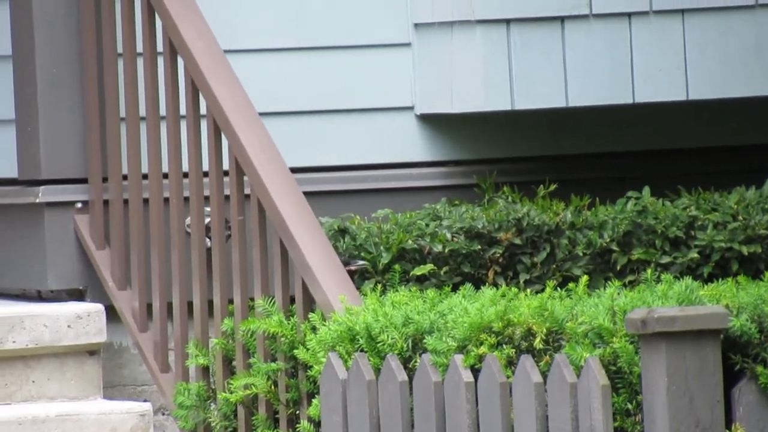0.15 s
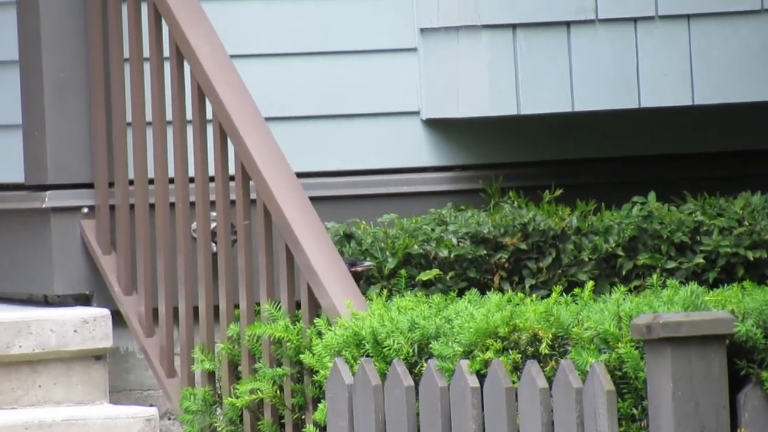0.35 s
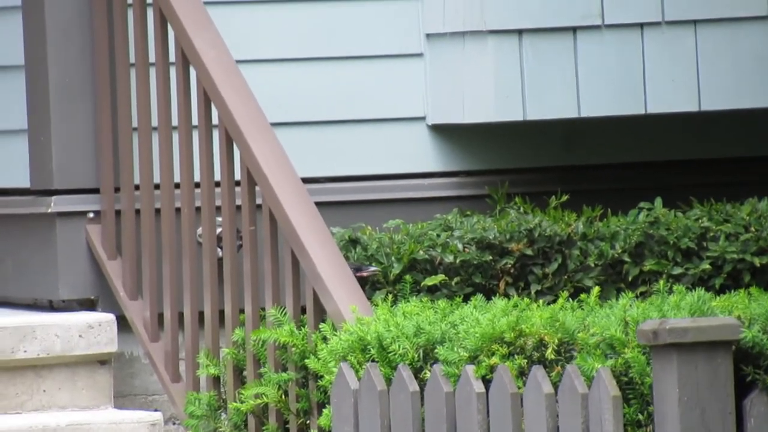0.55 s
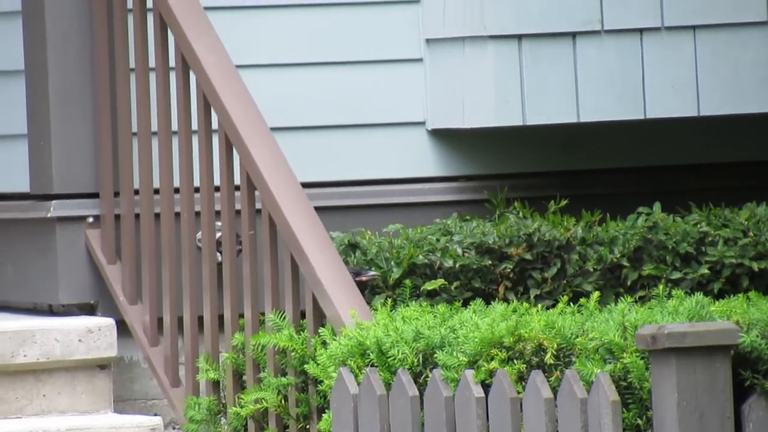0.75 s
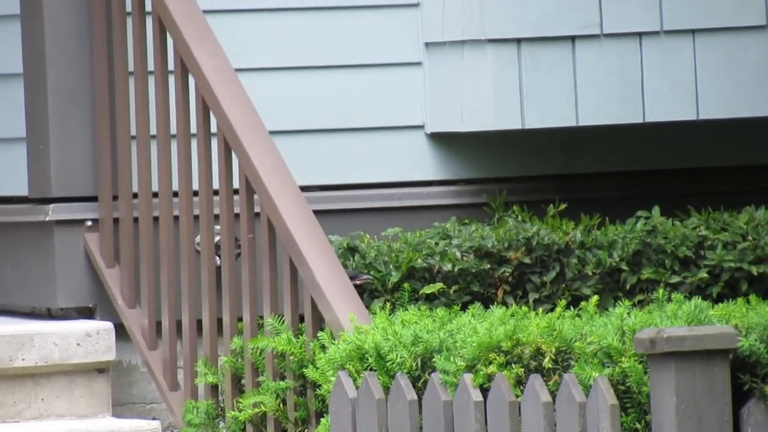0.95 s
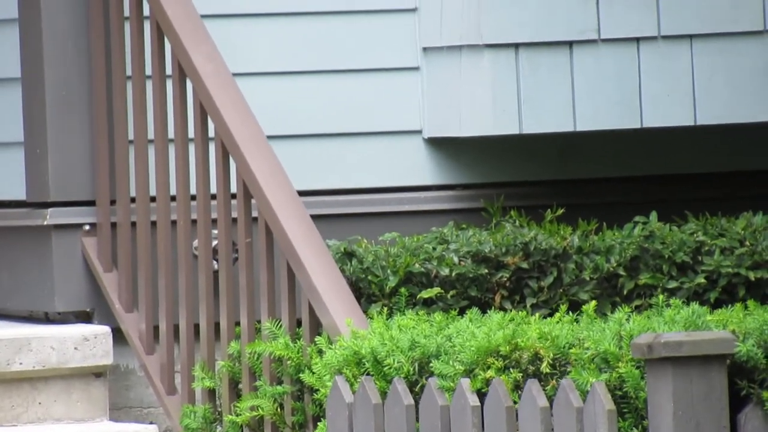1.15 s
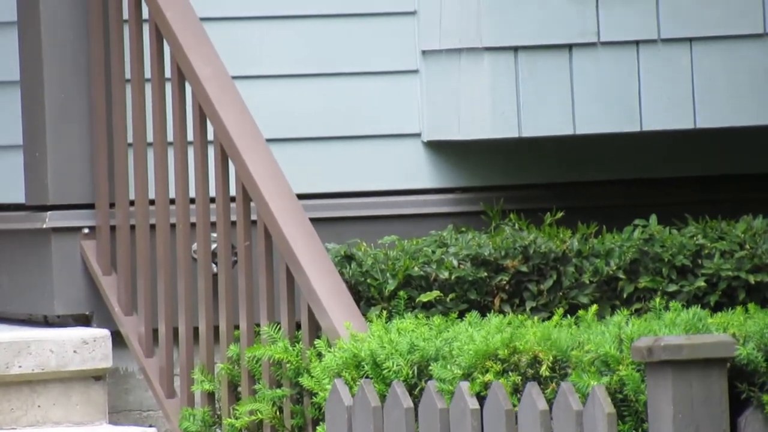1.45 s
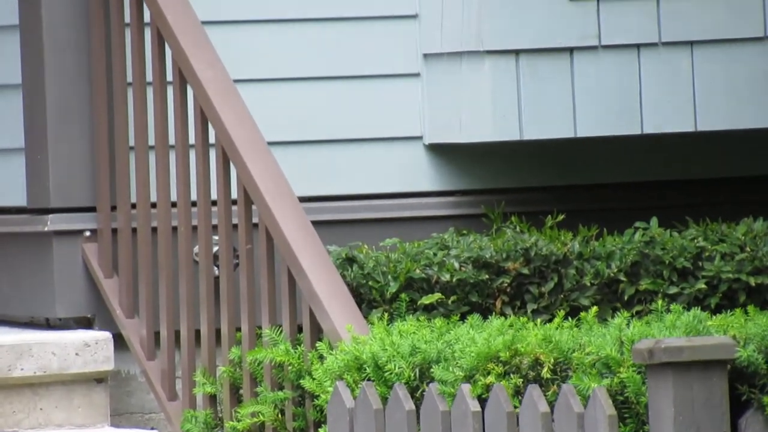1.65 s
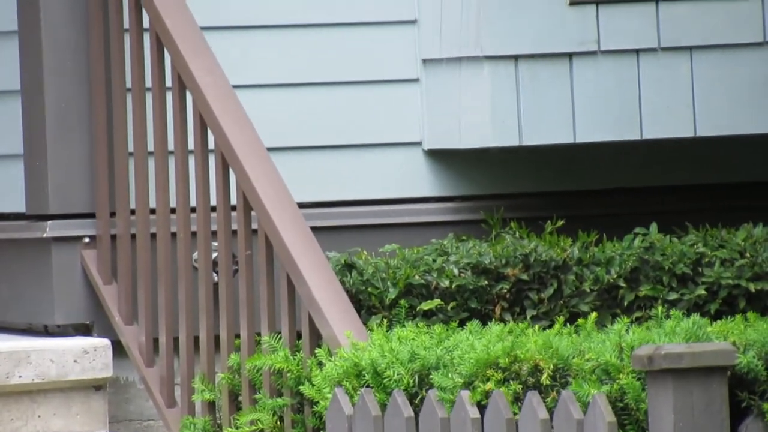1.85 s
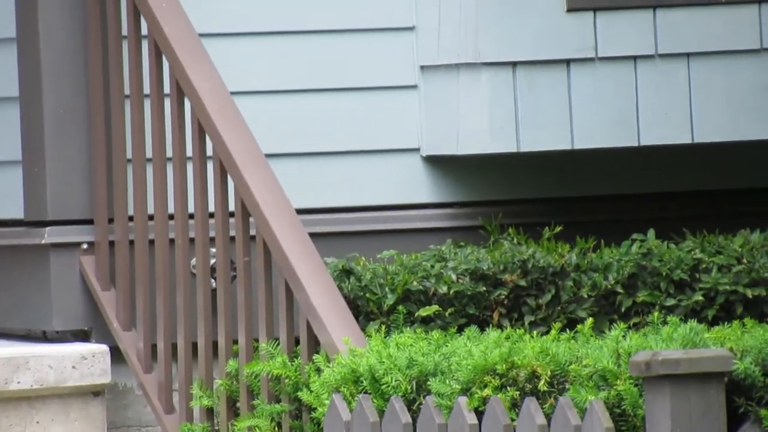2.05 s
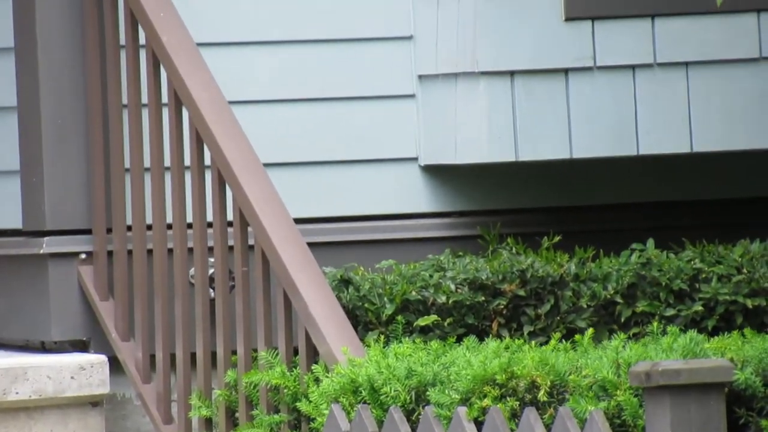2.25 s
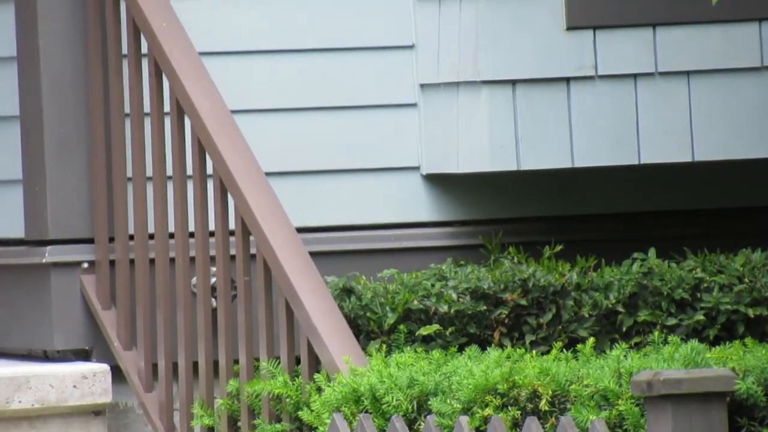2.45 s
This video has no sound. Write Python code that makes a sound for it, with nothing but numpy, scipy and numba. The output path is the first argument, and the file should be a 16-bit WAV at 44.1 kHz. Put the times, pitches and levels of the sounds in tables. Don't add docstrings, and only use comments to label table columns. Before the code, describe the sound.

A crow gives four harsh, ragged caws in a yard between houses over faint town rumble

```python
import sys
import numpy as np
from scipy import signal
from scipy.fft import rfft, irfft
from scipy.io import wavfile
from scipy.ndimage import uniform_filter1d, minimum_filter1d
from numba import njit

SR = 44100
rng = np.random.default_rng(int(sys.argv[2]) if len(sys.argv) > 2 else 0)


def boost_factor(decibels):
    exponent = np.asarray(decibels, float) / 20
    return 10 ** exponent


def wrap_up_sound(samples):
    columns = np.atleast_2d(samples).T
    tamed = np.clip(columns, -1, 1)
    steps = np.round(tamed * 32767).astype(np.int16)
    wavfile.write(sys.argv[1], SR, steps)


N = 114660

# (frequency [Hz], level per Hz [dB])
TOWN_SPECTRUM = [(18, -47), (30, -0.5), (216, 1.5), (355, -6.5), (754, 1.5), (837, -0.5), (1000, -3),
                 (2770, -22.5), (15000, -33.5)]
# (time [s], level [dB], frequency [Hz], length [s])
RUSTLES = [
    (0.073, -58, 7200, 0.015),
    (0.027, -44.5, 1170, 0.019),
]
# (time [s], effort [dB], pitch [Hz])
CAWS = [
    [(.195, -44.5, 330.9), (.205, -31.5, 393.4), (.23, -26.5, 519.4), (.3, -20.5, 576.5),
     (.38, -22.5, 543.6), (.46, -25, 492.6), (.52, -27.5, 443), (.57, -44, 420.5)],
    [(.784, -43.5, 299.6), (.792, -29.5, 361.9), (.812, -19.5, 492.9), (.87, -18, 522.8),
     (.94, -18.5, 491.9), (1.03, -23, 430.3), (1.09, -27.5, 400.4), (1.14, -42.5, 374.9)],
    [(1.403, -44.5, 298.3), (1.409, -30.5, 370.8), (1.43, -22, 470.8), (1.48, -21.5, 535.3),
     (1.6, -23, 465.7), (1.69, -28.5, 419.2), (1.735, -31.5, 394.6), (1.77, -49, 372.6)],
    [(2.026, -43, 297.8), (2.032, -25, 398), (2.05, -22, 491.4), (2.09, -21.5, 544.5), (2.18, -25, 478.6),
     (2.25, -27, 433.1), (2.28, -41.5, 412.8), (2.31, -44, 390)],
]
# (facing the microphone [0-1], beak opening [0-1], pure-tone level [dB])
POSES = [
    (0., 0.14, -23.5),
    (.6, 0.49, -21.5),
    (1., 0.97, -21.5),
    (1., 0.96, -22.5),
]
# (frequency [Hz], width [Hz], level [dB], gain when facing [dB], rise with open beak [Hz])
RESONANCES = [(1150, 540, -17.5, -1.5, 32), (1510, 121, -4.5, -4.5, 95), (1753, 76, -7, -1, 28),
              (1997, 103, -21, 5, 56), (2254, 213, -16.5, 7, 44), (3420, 700, -23.5, 8, 21),
              (3770, 334, -21, 8, 0), (5116, 920, -20.5, 1.5, -150), (6318, 680, -22.5, 10, 509),
              (7326, 1160, -22.5, 7.5, 96), (9600, 1400, -28, 7.5, 29), (10890, 1100, -34, 11.5, 21),
              (13000, 2800, -35.5, 9, 2)]
# (period jitter [share], pulse size scatter [dB], long-short period step [share])
RAGGEDNESS = [
    (.085, 2., .03),
    (.075, 2., .04),
    (.04, 1.8, .06),
    (.045, 1.8, .05),
]
# (time [s], level [dB])
SNAPS = [
    (.202, -35),
    (.7785, -28),
    (.794, -26),
    (1.3993, -26),
    (1.408, -27),
    (2.0212, -24),
]
# (delay [s], level [dB])
NEAR_ECHOES = [
    (.00267, -10),
    (.00533, -12),
    (.0093, -14),
]
WALL_LAGS = np.array([709, 941, 1193, 1489, 1831, 2143, 2531, 2953])
# (time [s], firing rate [Hz], level [dB])
ENGINE_REVS = [(1.15, 42, -62), (1.3, 44, -50), (1.47, 45, -54), (1.52, 46.3, -43), (1.62, 47, -43),
               (1.67, 50, -53), (1.76, 53.5, -46), (1.85, 55.3, -40), (1.95, 56.5, -44), (2.05, 57, -46),
               (2.22, 57.5, -46), (2.26, 57, -56), (2.3, 56.5, -41), (2.38, 57.5, -50), (2.6, 55, -62)]
# (order [1], level [dB])
ENGINE_ORDERS = [(1, -13), (2, -9), (3, -8), (4, 0), (5, -14)]
# (time [s], pitch [Hz], level [dB], fourth-partial level [dB])
FAR_CALL = [
    (1.84, 386, -70, 8),
    (1.87, 387, -64, 9),
    (1.905, 396, -54, 6),
    (1.92, 394, -50, 6),
    (1.945, 391, -51, 2),
    (1.96, 390, -51, -14),
    (2.03, 376, -48, -16),
    (2.05, 370, -68, -16),
]
# (time [s], partials kept within this of the local top [dB],
# nothing above [Hz], fill-in noise level [dB], untouched below [Hz])
THIN_MOMENTS = [(.276, 3, 15000, -90, 9500), (.295, 4, 4200, -36, 0), (.555, 4, 6800, -54, 150),
                (1.025, 4, 15000, -33, 0), (1.11, 4, 15000, -40, 100), (1.345, 12, 3900, -90, 0)]
# (time [s], low edge [Hz], high edge [Hz], level [dB])
SIDE_NOISES = [(.505, 5000, 6500, -50), (.505, 7400, 9200, -53), (.735, 4100, 5300, -66),
               (.735, 11500, 14500, -70), (.993, 8800, 10500, -50), (1.805, 6700, 9100, -60),
               (1.805, 14400, 15300, -72)]


def level(x, db):
    return x * boost_factor(db) / np.sqrt(np.mean(x ** 2))


def curve(rows, column):
    rows = np.array(rows, float)
    return np.interp(np.arange(N) / SR, rows[:, 0], rows[:, column])


def walk(rate):
    k = int(SR / rate)
    held = np.repeat(rng.standard_normal(N // k + 1), k)
    return 1.28 * uniform_filter1d(uniform_filter1d(held, k), k)[:N]


@njit
def resonator(x, hz, width):
    y, b, l = np.empty(len(x)), 0., 0.
    for i in range(len(x)):
        g, k = np.tan(np.pi * hz[i] / SR), width[i] / hz[i]
        v = (b + g * (x[i] - l)) / (1 + g * (g + k))
        b, l, y[i] = 2 * v - b, l + 2 * g * v, k * v
    return y


def band(x, hz, width):
    hz = np.clip(hz + np.zeros(len(x)), 20, .45 * SR)
    width = 1.55 * width + np.zeros(len(x))
    return resonator(resonator(x, hz, width), hz, width)


def town():
    t = np.arange(N) / SR
    rumble, swell, table = 0, walk(0.27), np.array(TOWN_SPECTRUM)
    for hz in 30 * 2 ** np.arange(0, 9.1, .5):
        db = np.interp(np.log(hz), np.log(table[:, 0]), table[:, 1]) + .7 * swell + walk(8)
        db = db + np.tanh(4 * (t - 1.1)) * (hz < 1500)
        rumble = rumble + boost_factor(db) * band(rng.standard_normal(N), hz, hz / 1.84)
    out = level(rumble, -42)
    for s, db, hz, length in RUSTLES:
        rustle = level(band(rng.standard_normal(N), hz, hz * 0.46), db)
        out = out + rustle * np.exp(-((t - s) / length) ** 2)
    whine_hz, whine_db, whine_start_s = 8300, -72, 2.42
    whine = np.sin(2 * np.pi * whine_hz * t) * (t > whine_start_s)
    return out + boost_factor(whine_db + 2.4 * walk(20)) * whine


@njit
def fire(hz, stretch, size):
    pulses, phase, p, k = np.zeros(len(hz) + 1), np.empty(len(hz)), 0., 0
    for i in range(len(hz)):
        step = hz[i] * stretch[k] / SR
        p += step
        if p >= 1:
            p, k = p - 1, k + 1
            pulses[i] += size[k] * p / step
            pulses[i + 1] += size[k] * (1 - p / step)
        phase[i] = p
    return pulses[:-1], phase


def throat_source(hz, effort, which):
    cycles = np.arange(N // 20)
    cycle_start = np.searchsorted(np.cumsum(hz) / SR, cycles).clip(0, N - 1)
    jitter, scatter_db, step = np.array(RAGGEDNESS)[which[cycle_start]].T
    length_chance, size_chance = rng.standard_normal((N // 20, 2)).T
    stretch = np.exp(jitter * length_chance + step * (-1) ** cycles)
    pulses, phase = fire(hz, stretch, boost_factor(scatter_db * size_chance))
    puffs = np.exp(-phase / .3) * rng.standard_normal(N)
    growl_db = .9 * walk(70)
    source = (level(pulses, 0) + level(puffs, -7)) * boost_factor(growl_db) * effort
    for s, db in SNAPS:
        start = int(s * SR)
        source[start:start + 5] += 6 * boost_factor(db) * np.hanning(5)
    return source


def throat_and_beak(source, hz, effort, facing, beak):
    follow_pitch, beak_widens, quiet_dulls = 0.56, 0.52, 0.2
    glide = 1 + follow_pitch * beak ** 3 * (np.maximum(hz, 430) / 505 - 1)
    dull = np.clip(effort * boost_factor(24.5), 0, 1) ** (quiet_dulls * (1 - facing))
    voice = 0
    for k, (f, width, db, facing_db, rise) in enumerate(RESONANCES):
        centre = (f + rise * beak) * (glide if k < 5 else 1)
        ring = band(source, centre, width * (1 + beak_widens * beak * (0 < k < 5)))
        gain = boost_factor(db + facing_db * facing) * np.sqrt(SR / 5 / width) * (dull if k > 6 else 1)
        sign = (-1) ** (k - (k > 1) - (k > 10))
        voice = voice + sign * gain * ring
    return voice


def pure_tone(hz, effort, beak, tone_db):
    wobble = .012 * (7 - 6 * beak) * walk(60)
    turns = 2 * np.pi * np.cumsum(hz * (1 + wobble)) / SR
    tone = np.sin(turns) + boost_factor(-2.5) * beak * np.sin(2 * turns)
    tone = tone * boost_factor(tone_db - 20.0 + 2.8 * walk(40.24))
    return tone * np.clip(effort * boost_factor(23), 0, 1) ** 3.2


def crow():
    rows = [row for caw in CAWS for row in caw]
    hz, effort = curve(rows, 2), boost_factor(curve(rows, 1))
    effort = effort * np.clip(effort * boost_factor(42), 0, 1) ** 3
    starts = [caw[0][0] - .02 for caw in CAWS]
    which = np.clip(np.searchsorted(starts, np.arange(N) / SR) - 1, 0, 3)
    facing, beak, tone_db = np.array(POSES)[which].T
    source = throat_source(hz, effort, which)
    voice = throat_and_beak(source, hz, effort, facing, beak)
    return voice, pure_tone(hz, effort, beak, tone_db)


@njit
def walls(x, lags, gain, damp):
    line, soft, out = np.zeros((8, 8192)), np.zeros(8), np.zeros(len(x))
    for i in range(len(x)):
        total = 0.
        for k in range(8):
            soft[k] += (1 - damp) * (gain[k] * line[k, (i - lags[k]) & 8191] - soft[k])
            total += soft[k]
            out[i] += soft[k] * (1 - 2 * (k % 2))
        for k in range(8):
            line[k, i & 8191] = x[i] + soft[k] - total / 4
    return out


def yard(bird):
    t60_s, ringing_db, damping = 0.43, -7.5, .45
    ringing = walls(bird, WALL_LAGS, boost_factor(-60 * WALL_LAGS / SR / t60_s), damping)
    bounces = sum(boost_factor(db) * np.roll(bird, int(s * SR)) for s, db in NEAR_ECHOES)
    return bird + bounces + boost_factor(ringing_db) * ringing


def engine():
    t = np.arange(N) / SR
    turns = 2 * np.pi * np.cumsum(curve(ENGINE_REVS, 1) * (1 + 0.0014 * walk(11.87))) / SR
    turn_db = 9 * uniform_filter1d(1. * ((t > 2.07) & (t < 2.24)), size=1500)
    hum = 0
    for k, db in ENGINE_ORDERS:
        order_db = db + 2.5 * walk(14) + turn_db * ((k == 3) - (k == 4))
        order_db = order_db - 12 * (k == 3) * (t > 2.25)
        hum = hum + np.sin(k * turns) * boost_factor(order_db)
    thump_s, thump_db, thump_hz, thump_t60_s = 1.295, -36, 62, .35
    since = np.maximum(t - thump_s, 0)
    knock = np.sin(2 * np.pi * thump_hz * since) + np.sin(2 * np.pi * 1.7 * thump_hz * since)
    thump = boost_factor(thump_db) * knock * (1 - np.exp(-since / .012))
    thump = thump * np.exp(-np.log(1000) * since / thump_t60_s)
    return 1.36 * hum * boost_factor(curve(ENGINE_REVS, 2)) + thump


def far_bird():
    turns = 2 * np.pi * np.cumsum(curve(FAR_CALL, 1)) / SR
    call_db, bright = curve(FAR_CALL, 2), boost_factor(curve(FAR_CALL, 3))
    stack = np.sin(2 * turns) + boost_factor(-8) * np.sin(3 * turns) + bright * np.sin(4 * turns)
    return np.sqrt(2) * stack * boost_factor(walk(40) + 3 + call_db - 60 * (call_db < -67))


def scene():
    rumble = town()
    bird, tone = crow()
    mono = rumble + yard(bird) + tone + engine() + far_bird()
    return np.array([mono, mono])


def thin_out(x):
    size = 1500
    y, hz = x.copy(), np.arange(size // 2 + 1) * SR / size
    window = np.clip(1.1 * np.hanning(size) ** 2, 0, 1)
    for s, keep_db, top_hz, fill_db, from_hz in THIN_MOMENTS:
        a = int(s * SR) - size // 2
        bins = rfft(x[:, a:a + size] * window)
        strength = np.abs(bins)
        local_top = -minimum_filter1d(-strength, size=41, axis=1)
        lost = (strength < local_top * boost_factor(-keep_db)) | (hz > top_hz)
        lost = lost & (np.abs(hz - 1800) > 600) & (hz > from_hz)
        fill = irfft(rfft(rng.standard_normal(size)) * (np.abs(hz - 6590) < 350))
        y[:, a:a + size] += level(fill, fill_db) * window ** 2 - irfft(bins * lost)
    for s, low_hz, high_hz, db in SIDE_NOISES:
        a = int(s * SR) - size // 2
        noise = irfft(rfft(rng.standard_normal(size)) * (hz > low_hz) * (hz < high_hz))
        y[:, a:a + size] += level(noise, db) * np.sqrt(window) * np.array([[1], [-1]])
    return y


def band_limit(x):
    return signal.sosfilt(signal.butter(12, 15290, fs=SR, output="sos"), x)


def record(dry):
    x = signal.sosfilt(signal.butter(2, 47.4, "high", fs=SR, output="sos"), dry)
    x = signal.sosfilt(signal.ellip(8, .2, 60, 15300, fs=SR, output="sos"), x)
    mix = thin_out(x)
    return band_limit(mix)


dry = scene()
out = record(dry)
wrap_up_sound(out)
```